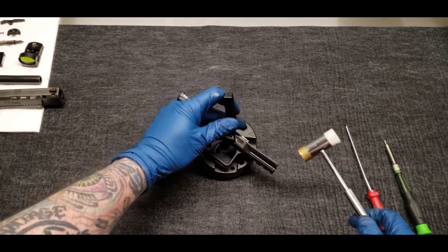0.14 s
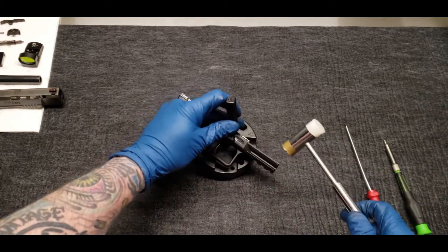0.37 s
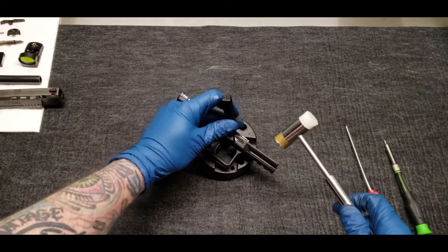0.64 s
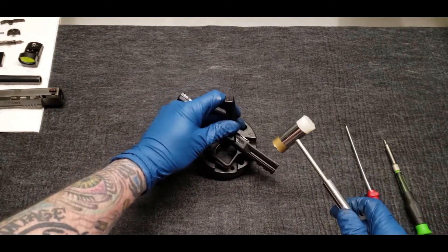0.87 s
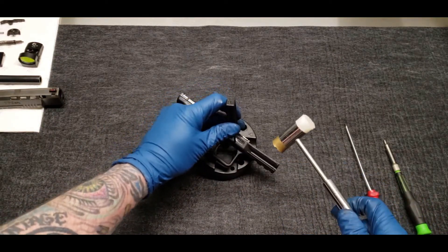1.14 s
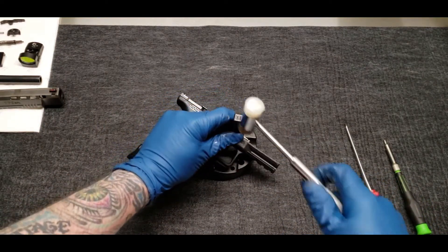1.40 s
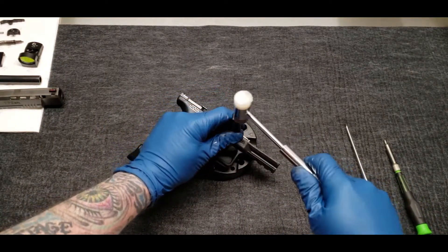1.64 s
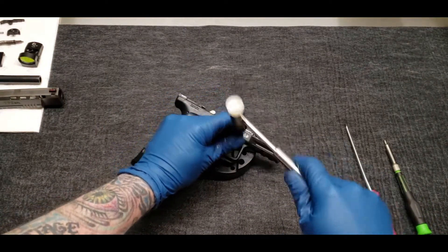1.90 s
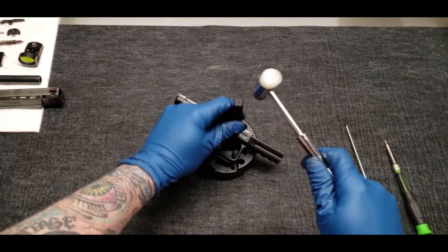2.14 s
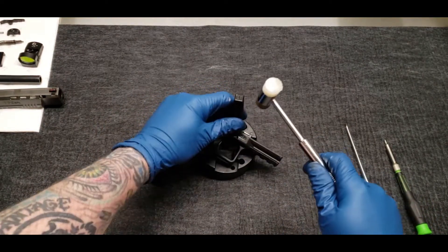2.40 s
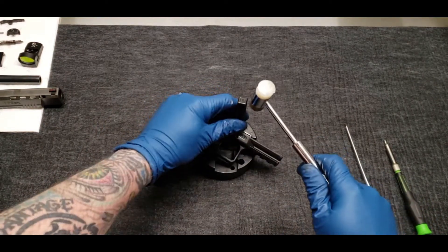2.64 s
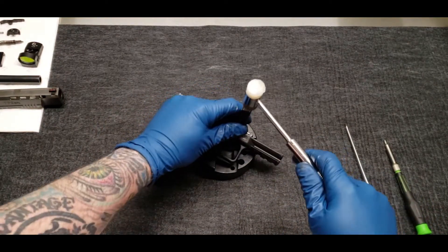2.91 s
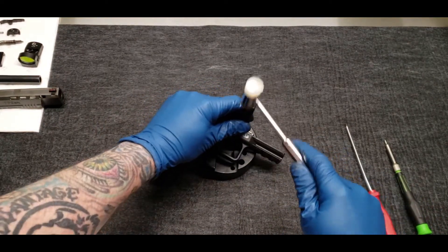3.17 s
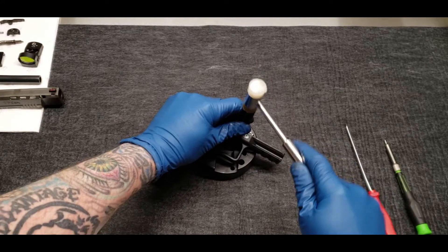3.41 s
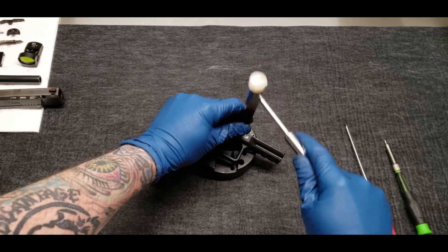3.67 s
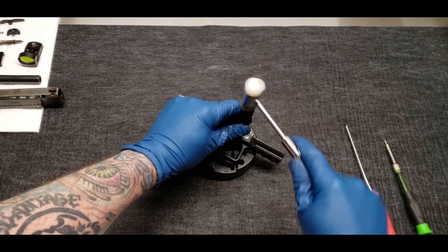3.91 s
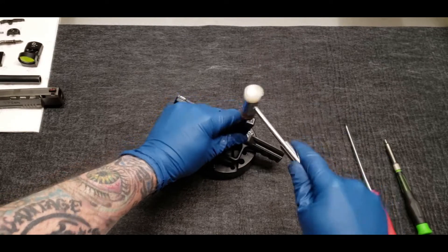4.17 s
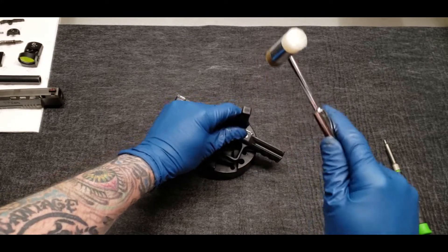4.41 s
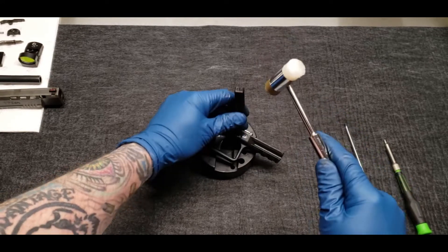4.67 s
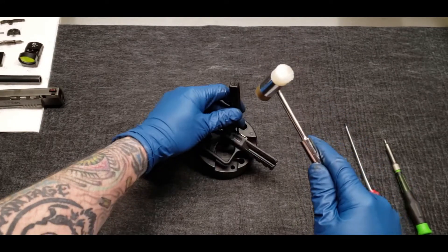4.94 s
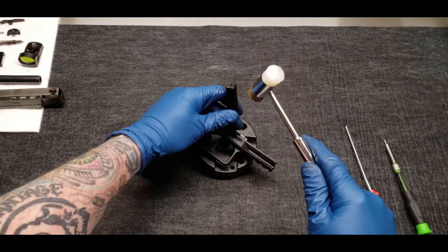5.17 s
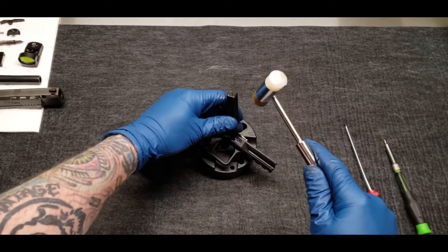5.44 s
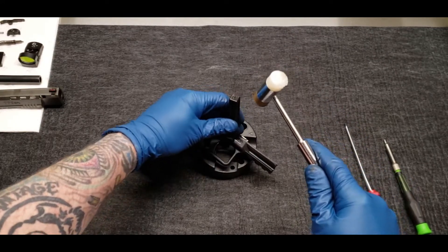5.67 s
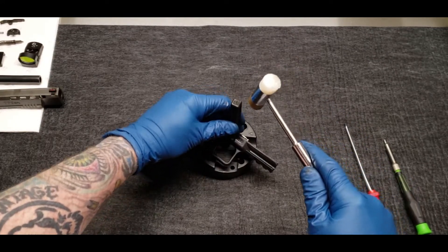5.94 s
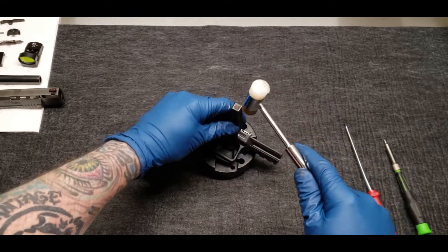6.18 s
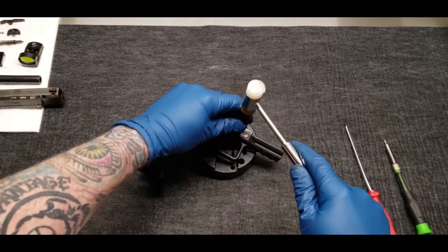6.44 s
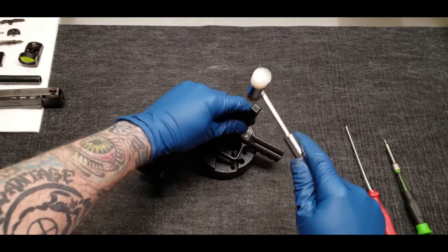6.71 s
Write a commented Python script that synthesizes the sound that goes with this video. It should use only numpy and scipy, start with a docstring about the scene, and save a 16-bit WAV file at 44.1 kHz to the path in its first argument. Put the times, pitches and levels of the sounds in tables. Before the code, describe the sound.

Quiet tool clicks and bumps on a cloth-covered bench, two sharp hammer taps, a run of five strengthening metallic blows, then sparse soft touches.

```python
"""Tools click and gloved hands bump and scuff on a cloth-covered wooden bench: noise bursts, struck and pressed modes.
From 1.7 s a small hammer taps a steel part on a plastic block: two taps, then five quick blows from 3.2 to 4.2 s.
Each blow pairs bright steel noise and short rings with a boom of bench modes, in a small hard room of noise echoes.
Sparse touches follow to the end. Throughout lie a low rumble, stirred up by the blows, and a faint hiss,
both made of coloured noise."""
import sys
import numpy as np
from scipy import signal
from scipy.io import wavfile

SR = 44100
rng = np.random.default_rng(int(sys.argv[2]) if len(sys.argv) > 2 else 0)


def generate_wav(sig):
    """Save sig (samples, or channels by samples) to the path in sys.argv[1] as 16-bit PCM at SR."""
    pcm = np.round(np.clip(np.atleast_2d(sig).T, -1, 1) * 32767).astype(np.int16)
    wavfile.write(sys.argv[1], SR, pcm)


def field_ratio(decibels):
    """Amplitude ratio for a level in dB (20 dB per decade); scalars and array-likes work."""
    return 10 ** (np.asarray(decibels, dtype=float) / 20)


N = 300762   # samples

# All table levels are relative; the scene's functions set the gain of each layer.
EDGES = 28 * 2 ** (np.arange(29) / 3)   # third-octave band edges, Hz
CENTRES = np.sqrt(EDGES[1:] * EDGES[:-1])
EAR_LAG = 3   # samples by which steel reaches the far microphone later


# hammer blows: start_s, steel_db, brightness [dB per octave], knock_db,
# low_modes_db [lowest bench modes over the knock]
BLOWS = [(1.6974, -24.5, -2.5, -13.5, 1.5), (1.9846, -23, -0.5, -43.5, 22),
         (3.1598, -24.5, -3, -10.5, -3.5), (3.4198, -20.5, -4, -6, -16.5), (3.6881, -15, -5, -4, -11.5),
         (3.9423, -14, -4, -2.5, -11), (4.2155, -13.5, -5.5, -2.5, -8)]
# part and block jump after a blow and land again: after_blow_s, steel_change_db, knock_change_db
LANDINGS = [(.0065, -12.5, -3.5), (.013, -16, -7.5), (0.023, -17.5, -10), (.037, -24, -14),
            (.084, -34, -21)]


def with_landings(blows):
    """Every blow followed by its landings, a little uneven in time and strength."""
    chance = rng.standard_normal((len(blows), len(LANDINGS), 2))
    hits = list(blows)
    for (s, steel_db, brightness, knock_db, low_modes_db), row in zip(blows, chance):
        for (lag, steel_change_db, knock_change_db), (late, strong) in zip(LANDINGS, row):
            hits.append((s + lag * (1 + .03 * late),
                         steel_db + steel_change_db + 2 * strong,
                         brightness,
                         knock_db + knock_change_db + 2 * strong,
                         low_modes_db))
    return hits


# modes of bench top and block: pitch_hz, level_db, t60_s [undamped], starting direction [sign]
BENCH = [(43.8, -23.5, 0.19, -1), (59, -8.5, 0.19, 1), (88, -7, 0.09, 1), (125.4, -20, 0.38, 1),
         (156, -17.5, 0.0091, -1), (210.7, -4, 0.1, -1), (255, -12, 0.04, 1), (297, -14.5, 0.044, -1),
         (374.3, -8, 0.13, -1), (405, -10, 0.031, 1), (434.8, -1.5, 0.05, 1), (502, -8, .04, 1),
         (520, -12.5, 0.04, 1), (572.7, -7, 0.11, -1), (636, -11.5, .05, 1), (657, -17.5, 0.049, -1),
         (711, -14, 0.086, 1), (745, -22, .05, -1), (809, -18.5, 0.079, 1), (887, -16.5, 0.064, -1),
         (937, -22, 0.023, 1), (976, -18, 0.09, -1), (1050, -22, .05, 1), (1104, -22.5, 0.033, 1),
         (1153, -26.5, 0.17, -1), (1258, -24.5, 0.08, 1), (1443, -21.5, 0.041, -1), (1522, -25.5, .07, 1),
         (1645, -25, 0.07, -1), (1800, -24, 0.032, 1)]


def bench(hits, push, spread_db):
    """Each hit drives every mode of the top with a strength of its own."""
    s, *_, knock_db, low_modes_db = np.transpose(hits)
    at, out = np.round(s * SR).astype(int), np.zeros(N)
    chance_db = spread_db * rng.standard_normal((len(at), len(BENCH)))
    for k, (hz, db, t60, direction) in enumerate(BENCH):
        clicks = np.zeros(N)
        mode_db = knock_db + (hz < 100) * low_modes_db + db + chance_db[:, k]
        clicks[at] = np.sign(direction) * field_ratio(mode_db)
        out += ring(clicks, hz, t60)
    return signal.fftconvolve(out, push)[:N]


def hard_push(lag_s=.001, contact_s=.00012):
    """The hammer's force reaches the top through block and cloth: late by a moment, short and smooth."""
    t = np.maximum(np.arange(SR // 50) / SR - lag_s, 0) / contact_s
    force = t * np.exp(-t)
    return force / np.sum(force)


# punch and part under the hammer: pitch_hz, level_db, t60_s
PART = [(2470, -3, 0.05), (3090, -7.5, 0.014), (4400, -8, .05), (4900, -6.5, .02), (5060, -7.5, .04),
        (7080, -12.5, .025), (8370, -16, .04), (10200, -15.5, .03), (11300, -8, .04), (12000, -8, .03),
        (13200, -12, .025), (14600, -12, .025)]


def hammer_steel(blows):
    """Hammer on steel: a noisy crack with a rattling tail, and the short modes of punch and part."""
    crack = contacts(blows, tick_db=13.0, snap_db=5.5, crack_t60=0.039,
                     rattle_t60=0.35, rattle_db=-14.5, echo_db=-30.0)
    return field_ratio(13.5) * crack + field_ratio(-9.5) * steel_ring(blows, PART)


# colour of a steel contact: pitch_hz, level_db [per Hz]
CONTACT = [(680, -12), (1200, -10.5), (2400, -14), (3300, -13.5), (4500, -13), (6000, -19.5), (8000, -16.5),
           (11500, -12.5), (16000, -14)]


def contacts(hits, tick_db, snap_db, crack_t60, rattle_t60, rattle_db, echo_db, focus_db=0):
    """Steel on steel: a sharp tick, snap, short burst and grainy rattle of loose parts, then the room by band."""
    colour_spread_db, snap_t60_s = 2, 0.014   # no two contacts have quite the same colour
    grains = field_ratio(3.0 * rng.standard_normal(N // 60 + 1)).repeat(60)[:N]
    white, out = rng.standard_normal((2, 2, N)), 0   # neighbouring bands get unrelated noise
    for k, (hz, db, t60) in enumerate(zip(CENTRES, at_hz(CONTACT), at_hz(ROOM))):
        if hz <= CONTACT[0][0]:
            continue
        chance_db = colour_spread_db * rng.standard_normal(len(hits))
        onsets = clicks_at(hits, hz, chance_db, focus_db)
        snap = field_ratio(snap_db) * dying(onsets, snap_t60_s)
        crack = dying(onsets, crack_t60)
        rattle = field_ratio(rattle_db) * np.roll(grains, k // 3 * 999) * dying(onsets, rattle_t60)
        echo = field_ratio(echo_db) * dying(onsets, t60)
        noise = (snap + crack + rattle + echo) * white[k % 2]
        tick = field_ratio(tick_db) * np.array([onsets, -np.roll(onsets, EAR_LAG)])
        sos = signal.butter(2, EDGES[k:k + 2], "band", fs=SR, output="sos")
        out = out + field_ratio(db) * signal.sosfilt(sos, noise + tick)
    return out


def steel_ring(hits, modes, ring_db=0, focus_db=0):
    """Each touch rings the short modes of a steel object, with strengths of its own."""
    chance_db = 3 * rng.standard_normal((len(hits), len(modes)))
    out = np.zeros(N)
    for k, (hz, db, t60) in enumerate(modes):
        clicks = clicks_at(hits, hz, db + ring_db + chance_db[:, k], focus_db)
        out += ring(clicks, hz, t60)
    return np.array([out, -np.roll(out, EAR_LAG)])


def clicks_at(hits, hz, chance_db=0, focus_db=0):
    """One click a hit, its level tilted by brightness at this pitch and lifted near the hit's own pitch."""
    pivot_hz, tilt_octaves = 4500, (-1.4, 1.9)   # brightness tilts about the pivot, this far down and up
    focus_octaves = 0.15   # width of the lift
    s, db, brightness, *own = np.transpose(hits)
    if focus_db:
        db = db + focus_db * np.exp(-(np.log2(hz / own[0]) / focus_octaves) ** 2)
    tilt_db = brightness * np.clip(np.log2(hz / pivot_hz), *tilt_octaves)
    clicks = np.zeros(N)
    clicks[np.round(s * SR).astype(int)] = field_ratio(db + tilt_db + chance_db)
    return clicks


# tools clicking against each other and the part: start_s, level_db, brightness [dB per octave], own_pitch_hz
# [pitch that stands out], ring_db [free ring of the tool]
CLICKS = [(0.0546, -58, -1.5, 2900, 5.5), (0.317, -76, -13.5, 2515, 1), (0.3732, -51.5, 2.5, 6040, -24),
          (0.399, -50, 2, 5250, -16), (0.4434, -42.5, 4, 4900, -25), (0.5703, -67.5, -3, 2550, -13),
          (0.7302, -79.5, 18, 5160, 0), (0.7417, -66, 4, 5170, -15), (0.861, -76, -3.5, 2250, -10),
          (0.9208, -83.5, 13.5, 5400, -25), (0.995, -55.5, 1.5, 2600, -14), (1.8898, -64, -9, 2540, 11),
          (1.894, -52, -4.5, 1644, -10), (1.9141, -50, -9, 5400, 3), (1.930, -54, -9, 2750, -3),
          (2.5115, -66.5, 6.5, 5220, -19), (2.7163, -86.5, -14, 2620, -1), (2.889, -79, 3, 2610, -14),
          (3.036, -73, -14, 2540, -4), (3.058, -60, -11.5, 2550, 6), (3.0894, -72, -9.5, 2600, -11),
          (4.3592, -50, -6, 8240, -14), (4.5644, -75, 1.5, 10950, -13), (4.7589, -74, 2.5, 7500, -4.5),
          (5.669, -72, -1.5, 2724, -9), (5.7695, -73, -5.5, 2570, 1), (5.8468, -76.5, -1.5, 5580, -10.5),
          (5.9994, -95, -8, 2600, -9), (6.112, -76, -12.5, 2594, -5), (6.2199, -78.5, 3, 5494, -18),
          (6.475, -85, 2.5, 7800, 9), (6.684, -65, -10, 2650, -11), (6.705, -71.5, -2, 3010, -3)]
# modes of the hand tools: pitch_hz, level_db, t60_s
TOOLS = [(1640, -27.5, 0.012), (2635, -1.5, 0.052), (4630, -14.5, 0.016), (5520, 1.5, 0.07),
         (7500, -18, 0.014), (8500, -15, 0.096), (11500, -11, 0.048)]


def tool_clicks():
    """Tools touching steel: short noisy contacts lifted at a pitch of their own, and the tools' free ring."""
    focus_db = 12.5
    touch = contacts(CLICKS, tick_db=17.5, snap_db=-1.5, crack_t60=0.011, rattle_t60=0.17,
                     rattle_db=-8.5, echo_db=-26.0, focus_db=focus_db)
    return field_ratio(22.0) * touch + steel_ring(CLICKS, TOOLS, np.array(CLICKS)[:, -1], focus_db)


# gloved hands and laid-down tools bumping the top: start_s, press_rise_s [time to the peak of the press],
# knock_db, low_modes_db [lowest bench modes over the knock]
BUMPS = [(0.05, 0.033, -52, 32), (0.294, 0.017, -41.5, -5), (0.394, 0.011, -45, -23),
         (0.44, 0.019, -46, -12), (0.565, 0.012, -48, 5), (0.73, 0.022, -53.5, 5), (0.85, 0.0089, -50.5, 5),
         (0.994, 0.015, -43, -10), (1.3, 0.052, -53.5, 1.5), (1.431, 0.0091, -47.5, -19),
         (1.884, 0.014, -26, -13.5), (1.9131, 0.0089, -40.5, 14.5), (1.957, 0.0057, -39, 27.5),
         (2.459, 0.015, -55.5, 5.5), (2.709, 0.018, -58.5, -5), (2.9, .02, -56.5, -8.5),
         (3.03, 0.012, -30.5, -16.5), (3.056, 0.015, -41, 21.5), (4.3579, 0.0092, -43, -10),
         (4.59, 0.022, -46, -13), (4.88, 0.022, -50, -2), (4.93, .025, -45, 9.5), (5.766, 0.012, -54.5, -1),
         (6.045, 0.018, -54, 1.5), (6.08, .012, -46.5, -9), (6.108, .018, -42.5, -8.5),
         (6.41, 0.022, -58, 8.5), (6.681, 0.015, -30.5, -4)]


def bumps(damping, low_hz=200, top_hz=520):
    """A glove or laid-down tool presses unevenly; its dull force drives the top's modes, damped by the hand."""
    swell = np.zeros((2, N + SR))   # force on the higher modes, force on the lowest
    for s, rise, knock_db, low_modes_db in BUMPS:
        t = np.arange(SR // 4) / SR / rise
        press = t * np.exp(-t) / np.sqrt(rise * SR / 4)
        swell[:, round(s * SR):][:, :len(t)] += press * field_ratio([[knock_db], [knock_db + low_modes_db]])
    force = swell[:, :N] * rng.standard_normal(N)
    force = signal.sosfilt(signal.butter(4, top_hz, fs=SR, output="sos"), force)
    force = signal.sosfilt(signal.butter(1, low_hz, "high", fs=SR, output="sos"), force)
    return sum(field_ratio(db) * ring(force[int(hz < 100)], hz, t60 / damping) for hz, db, t60, _ in BENCH)


# gloves and tools scuffing over the cloth: start_s, length_s, level_db, brightness [dB per octave]
SCUFFS = [(0.052, 0.071, -59.5, -1.5), (0.298, 0.11, -66.5, -2.5), (1.37, 0.091, -73.5, -1.5),
          (1.018, 0.023, -83.5, -20), (1.873, 0.041, -46.5, -4.5), (3.024, 0.1, -58.5, -8),
          (4.599, 0.095, -80, 2), (4.7, 0.12, -84, 8), (5.67, 0.059, -79.5, 2.5), (5.743, 0.069, -78.5, -7),
          (6.076, 0.061, -69, -7), (6.69, 0.077, -65.5, -5.5)]


def scuff_grains():
    """Each scuff is a swelling and fading run of tiny uneven contacts."""
    grains_per_s = 600   # with at least 4 and at most 60 grains a scuff
    grains = []
    for start, length, db, brightness in SCUFFS:
        count = int(np.clip(grains_per_s * length, 4, 60))
        when, size = rng.random((2, 60))[:, :count]
        for w, z in zip(when, size):
            swell_db = 20 * np.log10(np.sin(np.pi * w ** .6) + .05)
            grains.append((start + length * w, db + swell_db - 14 * z, brightness))
    return grains


def scuffs():
    """Cloth scuffs: a dense run of very short, soft contacts."""
    return field_ratio(15.5) * contacts(scuff_grains(), tick_db=-5.0, snap_db=-3.0, crack_t60=0.0044,
                                rattle_t60=0.085, rattle_db=-29.5, echo_db=-29.5)


# room by pitch: pitch_hz, t60_s, echo_db, likeness [left-right, 0 to 1]
ROOM = [(62, 0.23, 1, 0.99), (166, 0.24, -11.5, 0.91), (306, 0.5, -11.5, 0.85), (650, 0.42, -6.5, 0.1),
        (1420, 0.63, -2, 0.024), (2930, 0.9, 7, .05), (6500, 1, 3, .02), (11100, 0.67, -1.5, 0.036)]


def room(x, build_s=0.004):
    """Dense echoes: noise that builds up, then dies band by band; the bass is alike on both sides."""
    t, echo = np.arange(int(.9 * SR)) / SR, 0
    slices = bands(rng.standard_normal((2, 2, len(t))))
    likeness = np.clip(at_hz(ROOM, column=3), 0, 1)
    for (mid, side), t60, db, c in zip(slices, at_hz(ROOM), at_hz(ROOM, column=2), likeness):
        level = np.sqrt(7 / (t60 * SR))   # long tails start softer
        fading = field_ratio(db - 60 * t / t60) * (1 - np.exp(-t / build_s)) * level
        echo = echo + fading * (np.sqrt(1 + c) * mid + np.sqrt(1 - c) * side * [[1], [-1]])
    return signal.fftconvolve(x[None], echo, axes=1)[:, :N]


def shaking():
    """Each blow stirs the rumble of the loose bench up for a moment."""
    shake_db, shake_t60_s = -23, 0.58   # level against the knock, and its dying
    onsets = np.zeros(N)
    at = [round(row[0] * SR) for row in BLOWS]
    onsets[at] = field_ratio(np.array(BLOWS)[:, -2] + shake_db)
    return dying(onsets, shake_t60_s)


# low rumble through the bench, rising and sinking: time_s, level_db
RUMBLE = [(0.0, -47), (1.4, -51.5), (2.0, -36.5), (2.2, -49.5), (2.9, -52), (4.5, -58), (5.3, -60.5),
          (6.0, -57), (6.5, -61), (6.82, -48)]
# colour of the rumble: pitch_hz, level_db [per Hz]
RUMBLE_COLOUR = [(15, -40), (25, -20.5), (49, -2.5), (118, -0.5), (135, -8.5), (146, -20), (249, -15),
                 (328, -31.5), (356, -13), (447, -26), (579, -35.5), (659, -36), (1200, -51), (1560, -73),
                 (2640, -120)]


def bench_rumble():
    """Patchy low noise on a slow level curve, lifted by each blow."""
    level = field_ratio(np.interp(np.arange(N) / SR, *np.transpose(RUMBLE))) + shaking()
    rumble = level * steady(RUMBLE_COLOUR, at_hz(ROOM, column=3), patchy_db=4.0)
    return signal.sosfilt(signal.butter(4, 520, fs=SR, output="sos"), rumble)


# colour of the hiss: pitch_hz, level_db [per Hz]
HISS = [(700, -10.5), (1700, 0), (4400, -1), (7000, -7), (12000, -10), (16000, -10.5)]
# the hiss sinks, then holds: time_s, level_db
HISS_DB = [(0, -83), (3.0, -85), (4.7, -90), (6.82, -90)]


def faint_hiss():
    """Even coloured noise, unrelated left and right, on a slow level curve."""
    level = field_ratio(np.interp(np.arange(N) / SR, *np.transpose(HISS_DB)))
    return level * steady(HISS, 0 * CENTRES, patchy_db=0)


def steady(colour, alike, patchy_db):
    """Coloured stereo noise whose bands wander in level by patchy_db."""
    out, together = 0, drift(3.0)
    slices = bands(rng.standard_normal((2, 2, N)))
    for (mid, side), db, c in zip(slices, at_hz(colour), np.clip(alike, 0, 1)):
        gain = field_ratio(db + patchy_db * (.45 * together + drift(8.0)))
        out = out + gain * (np.sqrt(1 + c) * mid + np.sqrt(1 - c) * side * [[1], [-1]])
    return rms_one(out)


def drift(rate_hz):
    """Slow random wandering: smoothed noise of rms 1 on 60 knots a second."""
    knots = rng.standard_normal(int(60 * N / SR))
    r = np.exp(-2 * np.pi * rate_hz / 60)
    slow = rms_one(signal.lfilter([1], [1, -r], knots))
    return np.interp(np.arange(N) * 60 / SR, np.arange(len(knots)), slow)


def at_hz(points, column=1):
    """A table column at the centre of every band."""
    points = np.array(points)
    return np.interp(np.log(CENTRES), np.log(points[:, 0]), points[:, column])


def bands(x):
    """Third-octave slices, neighbours taken from two unrelated noises."""
    return [signal.sosfilt(signal.butter(2, edge, "band", fs=SR, output="sos"), x[k % 2])
            for k, edge in enumerate(zip(EDGES, EDGES[1:]))]


def rms_one(x):
    """Scaled to unit rms."""
    return x / np.sqrt(np.mean(x ** 2) + 1e-20)


def dying(onsets, t60):
    """Each onset starts an exponential fall."""
    return signal.lfilter([1], [1, -field_ratio(-60 / (t60 * SR))], onsets + 1e-18)


def ring(clicks, hz, t60):
    """A unit click sets a decaying sine of starting height 1 ringing."""
    r, w = field_ratio(-60 / (t60 * SR)), 2 * np.pi * hz / SR
    return signal.lfilter([0, np.sin(w)], [1, -2 * r * np.cos(w), r * r], clicks + 1e-18)


def limiter(x, ceiling_db, release_db_s, attack_s):
    """The gain drops by what the level exceeds the ceiling, a moment late, and climbs back steadily."""
    climb = release_db_s * np.arange(N) / SR
    over_db = np.maximum(20 * np.log10(abs(x).max(axis=0) + 1e-9) - ceiling_db, 0)
    held_db = np.maximum.accumulate(over_db + climb) - climb
    r = np.exp(-1 / (attack_s * SR))
    return x * field_ratio(-signal.lfilter([1 - r], [1, -r], held_db))


def scene():
    """Blows and touches with their echoes, over rumble and hiss."""
    blows = with_landings(BLOWS)
    boom = field_ratio(1.0) * bench(blows, hard_push(), spread_db=3.0)
    boom += field_ratio(4.0) * bumps(damping=3.1)
    steel = hammer_steel(blows) + tool_clicks() + scuffs()
    low = boom + room(boom) + bench_rumble()
    low_balance = field_ratio([[.5], [-.5]])   # the low layers are slightly louder on the left
    return low * low_balance + steel + faint_hiss()


def top_cut(x):
    """Nothing passes above the cut-off."""
    return signal.sosfilt(signal.butter(12, 16960, fs=SR, output="sos"), x)


def record(dry, bass_cut_hz=32):
    """The deepest bass is lost, loud blows are limited and softly rounded, and the top is cut."""
    thin = signal.sosfilt(signal.butter(2, bass_cut_hz, "high", fs=SR, output="sos"), dry)
    even = np.tanh(limiter(thin, ceiling_db=-2.5, release_db_s=300, attack_s=.0005))
    cut = signal.sosfilt(signal.cheby2(10, 60, 17000, fs=SR, output="sos"), even)
    return top_cut(cut)


dry = scene()
out = record(dry)
generate_wav(out)
```